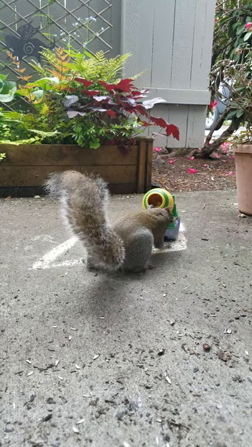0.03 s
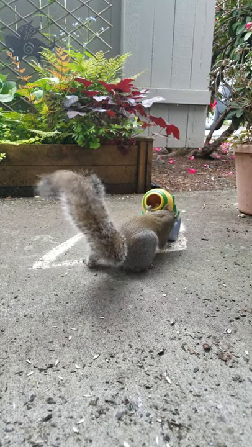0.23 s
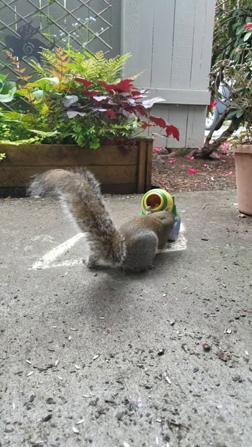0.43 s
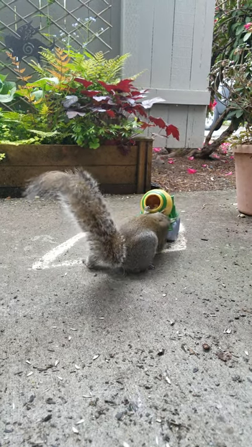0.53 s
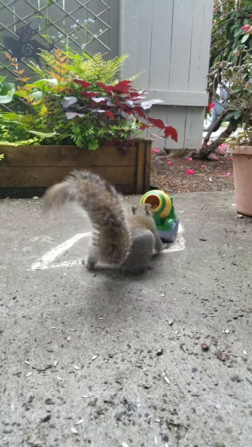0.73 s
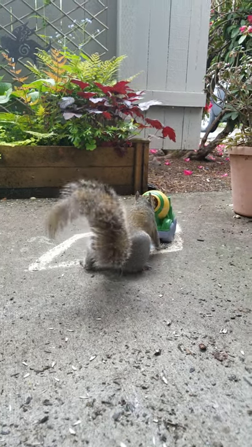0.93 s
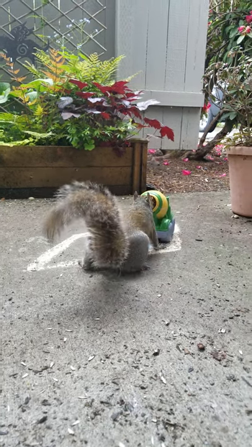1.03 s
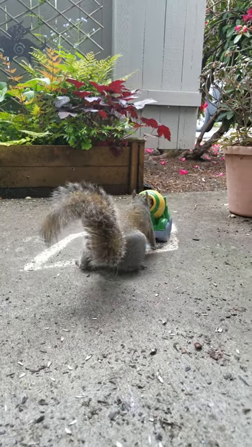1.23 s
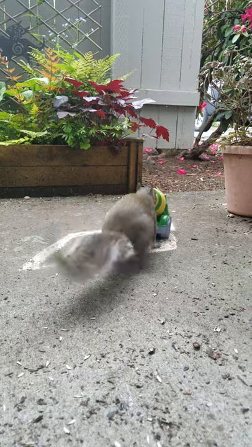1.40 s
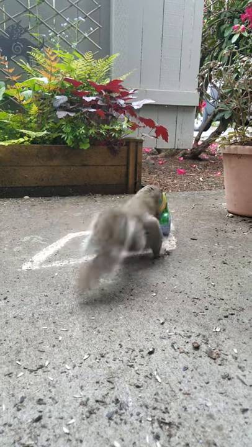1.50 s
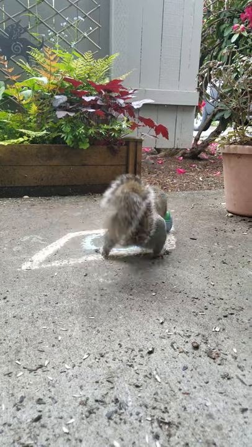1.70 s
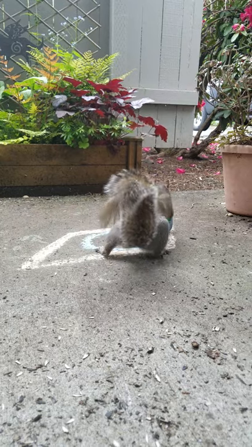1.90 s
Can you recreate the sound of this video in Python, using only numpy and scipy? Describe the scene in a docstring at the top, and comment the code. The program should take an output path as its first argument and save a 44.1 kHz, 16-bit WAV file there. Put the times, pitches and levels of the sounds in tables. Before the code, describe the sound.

A hollow plastic toy clatters sharply on a concrete patio right at the start, settling by 0.3 seconds. A faint tick follows at 0.4 and a light scuff at 0.7. From about 1.3 to 1.9 seconds the toy is shoved along in jerks, knocking and scraping over crackling sand. It sounds a few metres away, with a short echo, above a low outdoor rumble and faint distant drone.

```python
"""A hollow plastic toy clatters on a concrete patio, knocked by a squirrel a few metres from the mic.
Small ticks and a brief scuff fall in the pause; then the squirrel shoves the toy along in jerks, over
sand, until it rocks to rest. Blows and stick-slip catches ring the same shell, and fence and house wall
answer. A low outdoor rumble and a distant drone lie underneath. Stereo, from two microphone ports."""
import sys
import numpy as np
from scipy import signal
from scipy.fft import rfft, irfft, next_fast_len
from scipy.io import wavfile

SR = 44100
rng = np.random.default_rng(int(sys.argv[2]) if len(sys.argv) > 2 else 0)


def to_wav(sig):
    """Store sig (one row per channel, or 1-D mono) as 16-bit WAV at the path in sys.argv[1].

    Samples outside -1..1 are clipped; the rate is SR.
    """
    pcm = np.clip(np.atleast_2d(sig), -1, 1) * 32767
    pcm = np.round(pcm).astype(np.int16)
    wavfile.write(sys.argv[1], SR, pcm.T)  # frames by channels


N = 85995
T = np.arange(N) / SR
SIZE = next_fast_len(2 * N)
HZ = np.maximum(np.arange(SIZE // 2 + 1) * SR / SIZE, 1)

# Table levels are relative; pan is left minus right.
# outdoor rumble: f/Hz, level/dB
RUMBLE_COLOUR = [(25, -37), (48, -15), (70, -17.5), (100, -3.5), (125, -6), (180, -9), (265, -7),
                 (310, -16), (660, -17), (1080, -14), (1400, -29.5), (1900, -37), (2600, -38), (4500, -47),
                 (7300, -56), (10000, -54), (16000, -48.5)]
# the rumble's side signal against its mid: f/Hz, level/dB
RUMBLE_SIDE = [(30, -4), (120, -43), (300, -32.5), (800, -7.5), (2000, 0.5), (16000, 0)]
# distant drone: t/s, level/dB
DRONE_SWELL = [(0, -64), (.22, -53.5), (.35, -47), (.5, -72), (.63, -48.5), (.83, -44), (1.0, -67.5),
               (1.5, -49), (1.94, -49)]
# echo off fence and house wall: f/Hz, level/dB
ECHO_COLOUR = [(200, 1), (800, 8), (2500, 6.5), (4700, 6), (9000, 4.5), (16000, -3.5)]
# dry ticks and cracking sand grains: t/s, level/dB, centre f/Hz, width/octaves, t60/s
TICKS = [(0.4253, -34, 11000, 0.91, 0.058), (1.463, -30.5, 13000, .5, 0.084),
         (1.5967, -34, 13500, .35, .045), (1.7144, -38, 12100, 0.28, 0.05),
         (1.7962, -33, 11500, 0.57, 0.066), (1.837, -34, 13200, 0.32, 0.035)]
# scuff on the concrete: f/Hz, level/dB
SCUFF_COLOUR = [(800, -23), (2000, 2), (3000, 5.5), (4200, -9), (6200, -7.5), (8500, -18.5), (13000, -15),
                (16000, -26)]
# sand grinding under the toy: t/s, level/dB
GRIT_SWELL = [(1.34, -80), (1.44, -77), (1.47, -58.5), (1.55, -66.5), (1.61, -59.5), (1.71, -65),
              (1.75, -74), (1.78, -66), (1.805, -67), (1.86, -67), (1.89, -82)]
# spectrum of that sand: f/Hz, level/dB
GRIT_COLOUR = [(2000, -35), (5000, 13.5), (6300, 1), (8300, 1.5), (9400, 13), (10000, -1), (16000, -1.5)]
# main modes of the shell: f/Hz, level standing free/dB, level pressed down/dB, t60/s, pan/dB
SHELL_MODES = [(483, -23, -5, 0.049, -4.5), (579, -11, -2.5, 0.055, -2.5), (678, -7, -21, 0.084, 10.5),
               (669, -1, -8, 0.029, 11), (842, 5.5, 5, 0.093, -8), (927, -3.5, -12, 0.051, 3),
               (1123, -5, -11.5, 0.081, -16), (1225, -19, -0.5, 0.036, -7), (1567, -9, -8.5, 0.078, 9.5),
               (1865, -3, -7.5, 0.045, 8.5), (2165, -15.5, -21, 0.09, 6), (2663, -14, -10.5, 0.042, -10),
               (4060, -14.5, -17, 0.068, 6.5), (4404, -11.5, -23, 0.033, -14)]
# dense shell modes between and above them: f/Hz, level/dB
DENSE_COLOUR = [(300, 4), (500, -15.5), (640, -4.5), (1250, 4), (1550, -4.5), (1900, -1.5), (2850, -2),
                (3150, -7.5), (3650, -16.5), (4400, -12.5), (5700, -23.5), (7500, -30.5), (8600, -23.5),
                (12000, -26), (16000, -44)]
# balance of the dense modes at the ports: f/Hz, pan/dB
DENSE_PAN = [(500, -10.5), (1150, -7), (1600, -7.5), (2100, 1), (3000, -7), (4500, -9.5), (7000, 5),
             (10500, -2.5), (13000, 15)]
# friction while the toy slides: t/s, level/dB
DRAG_SWELL = [(1.335, -68), (1.345, -41), (1.385, -47), (1.43, -42), (1.452, -40.5), (1.465, -34),
              (1.52, -36), (1.545, -54.5), (1.575, -40.5), (1.61, -35.5), (1.632, -37), (1.665, -40.5),
              (1.69, -44.5), (1.715, -56.5), (1.75, -52.5), (1.81, -49), (1.88, -55.5)]
# blows on the toy: t/s, level/dB, treble/dB, sizzle/dB, pitch ratio of the loaded shell
KNOCKS = [(.0512, -9.5, -1.5, 14.5, 1.06), (.0536, 3, 1.5, 3, .98), (.0552, -1.5, -2, 1, 1.046),
          (.0605, -7.5, 4, 8, 1.01), (.075, -2, -1, 6, 0.95), (.092, -9, -3, 5, 1.06),
          (.1318, -6.5, -13, -29, 0.98), (.1965, -12.5, 0, -6, 1.04), (1.3375, -17, 3.5, -9, 0.91),
          (1.347, -11, -0.5, -14, 0.9), (1.3625, -5, -5.5, -2.5, 1), (1.383, -13.5, -7, -5, .98),
          (1.420, -10, -16, -19, 0.92), (1.457, -16.5, 7, -8, 1.18), (1.484, -6, -6, -5, .99),
          (1.502, -29, 10, -3, .98), (1.524, -8, -2.5, -16, 1.01), (1.561, -11, -2, -2, 0.98),
          (1.580, -12.5, -10, -9, 0.9), (1.599, -16, 3, -21, 1.09), (1.635, -29, -29, -28, 0.71),
          (1.657, -6.5, -5, -3, 1.13), (1.671, -13, 5, -5, 0.98), (1.733, -12.5, -7.5, 4, 0.95),
          (1.741, -9, -9.5, -3, 1.06), (1.772, -13, -4.5, -9, 1.03), (1.784, -16, 6, -23, 1.2),
          (1.838, -13, -4, 4.5, 1.02)]
# single panels or parts struck: t/s, level/dB, f/Hz, t60/s
PANEL_PINGS = [(.0532, -5, 720, 0.027), (.056, -10.5, 2554, 0.073), (0.059, -10.5, 4286, 0.038),
               (.056, -25, 4660, 0.084), (0.1967, -16, 625, .045), (0.1966, -25, 1890, 0.019),
               (1.458, -17.5, 3974, 0.043), (1.457, -8, 1080, 0.026), (1.501, -11.5, 568, 0.13),
               (1.508, -16, 1840, .06), (1.597, -16, 1840, 0.081), (1.659, -6.5, 1180, .06)]
# the toy's direction from the mic: f/Hz, lead of the left port/rad
PORT_PHASE = [(0, 0), (800, .6), (1200, 2.6), (2000, 5.6), (3000, 7.6), (4000, 11.7), (5000, 15),
              (16000, 45)]

TREBLE_HZ, SIZZLE_HZ, RADIATION_HZ = 1600, 5700, 442
RING_S, CONTACT_S, SPOT_S = .16, .00018, .025  # length of a ring, its rise, time rubbed on one spot
DETUNE, MODE_SPREAD_DB = .0041, 1  # scatter per contact; DETUNE is the fraction at TREBLE_HZ
DENSE_DB, DENSE_T60_S = -5, .072
PRESSED_FROM_S, PRESSED_RING, PRESSED_CONTACT = 1.3, .74, .86  # paws press down: factors on t60 and rise


def undb(db):
    """Decibels to gain."""
    return 10 ** (np.asarray(db) / 20)


def curve(points):
    """Gain at each frequency from (f/Hz, level/dB) points."""
    hz, db = np.array(points).T
    return undb(np.interp(np.log(HZ), np.log(hz), db))


def swell(points):
    """Gain in time from (t/s, level/dB) points, silent outside them."""
    s, db = np.array(points).T
    return undb(np.interp(T, s, db)) * (T > s[0]) * (T < s[-1])


def bump(hz, octaves):
    """A bell-shaped band."""
    return np.exp(-.5 * (np.log2(HZ / hz) / octaves) ** 2)


def fade(t60, start):
    """Sudden onset and exponential decay."""
    return (T >= start) * np.exp(-np.log(1000) * np.maximum(T - start, 0) / t60)


def filt(x, gain):
    """Apply a frequency response."""
    return irfft(rfft(x, SIZE) * gain, SIZE)[..., :N]


def unit(x):
    """Scale to a mean energy of 1 per channel."""
    return x / np.sqrt(np.mean(np.sum(x ** 2, axis=-1)))


def pan(db):
    """Port gains for a left-minus-right level difference."""
    return undb(np.array([[1], [-1]]) * db / 2)


def add(out, x, s):
    """Mix a sound in at s seconds."""
    i = int(s * SR)
    out[:, i:i + x.shape[1]] += x[:, :N - i]


def noise(gain):
    """Coloured noise, rms 1."""
    x = filt(rng.standard_normal(N), gain)
    return x / x.std()


def stereo_noise(gain, side):
    """Coloured noise with independent mid and side signals, rms 1."""
    mid_noise, side_noise = rng.standard_normal((2, N))
    x = filt(mid_noise, gain) + np.array([[1], [-1]]) * filt(side_noise, gain * side)
    return x / x.std()


def catches(per_s, spread_db=2.5):
    """Irregular small pushes of uneven size, rms 1."""
    hits = rng.random(N) < per_s / SR
    sizes = undb(spread_db * np.clip(rng.standard_normal(N), -2, 2))
    x = hits * sizes * rng.choice([-1, 1], N)
    return x / x.std()


def outdoors(drone_hz=134.8, right_lag_s=.00026):
    """A slightly fluttering rumble and a distant drone, reaching the left port first."""
    rumble = stereo_noise(curve(RUMBLE_COLOUR), curve(RUMBLE_SIDE))
    flutter_db = noise(bump(hz=9, octaves=.18))
    rumble *= undb(-47 + flutter_db)
    drone = undb(np.interp(T, *np.array(DRONE_SWELL).T)) * noise(bump(drone_hz, octaves=.08))
    ports = np.exp(-2j * np.pi * HZ * right_lag_s * np.array([[0], [1]]))
    return pan(-3) * filt(rumble + drone, ports)


def patio_echo(x):
    """Fence and house wall add a short diffuse echo to the direct sound."""
    tail = unit(stereo_noise(curve(ECHO_COLOUR), side=.64) * fade(t60=.32, start=.0099))
    return x + undb(-15) * filt(x, rfft(tail, SIZE))


def tap(s=.7127, hz=1600):
    """One tiny dull tap, close up at the right-hand port."""
    ring = np.sin(2 * np.pi * hz * (T - s)) * fade(t60=.0012, start=s)
    return pan(-26.5) * undb(-30.5) * filt(ring, bump(hz, octaves=1))


def ticks():
    """Dry ticks and cracking grains: short bursts of high noise."""
    out = np.zeros((2, N))
    for s, db, hz, octaves, t60 in TICKS:
        burst = rng.standard_normal((2, N)) * fade(t60, s)
        out += undb(db) * unit(filt(burst, bump(hz, octaves)))
    return out


def sand(colour, per_s):
    """Grains crushed on concrete, independent at each port, rms 1."""
    x = filt(np.array([catches(per_s), catches(per_s)]), curve(colour))
    return x / x.std()


def scuff(s=.699, width_s=.018):
    """One light scuff over the sandy concrete."""
    return undb(-55) * sand(SCUFF_COLOUR, per_s=3500) * np.exp(-.5 * ((T - s) / width_s) ** 2)


def grit(clump_hz=30, clump_db=2):
    """The sliding toy crushes sand in clumps."""
    clumps = undb(clump_db * noise(bump(clump_hz, octaves=1)))
    return pan(.5) * swell(GRIT_SWELL) * clumps * sand(GRIT_COLOUR, per_s=2100)


def hardness(x, treble_db, sizzle_db):
    """A harder contact is brighter: two high shelves shape the top."""
    for hz, db in ((TREBLE_HZ, treble_db), (SIZZLE_HZ, sizzle_db)):
        g = undb(db) ** .5
        w = 2 * SR * np.tan(np.pi * hz / SR)
        shelf = signal.bilinear([g, np.sqrt(2 * g) * w, w * w], [1 / g, np.sqrt(2 / g) * w, w * w], SR)
        x = signal.lfilter(*shelf, x + 1e-18)
    return x


def shell(dense, pressed, pitch):
    """One ring of the shell: each contact weights and detunes the modes anew; pressure damps them."""
    t = T[:int(RING_S * SR)]
    hz, free_db, pressed_db, t60, pan_db = np.array(SHELL_MODES).T
    db, ring, rise = (pressed_db, PRESSED_RING, PRESSED_CONTACT) if pressed else (free_db, 1, 1)
    count = len(hz)
    detune = DETUNE * np.minimum(hz / TREBLE_HZ, 2) * rng.standard_normal(count)
    hz = pitch * hz * (1 + detune)
    weights = undb(db + MODE_SPREAD_DB * rng.standard_normal(count)) * (-1) ** np.arange(count)
    decay = -np.log(1000) * t / ring
    partials = np.sin(2 * np.pi * hz[:, None] * t) * np.exp(decay / t60[:, None])
    main_ring = (pan(pan_db) * weights) @ partials
    i = rng.integers(N - len(t))
    dense_ring = dense[:, i:i + len(t)] * np.exp(decay / DENSE_T60_S)
    attack = 1 - np.exp(-t / (CONTACT_S * rise))
    return unit(main_ring * attack) + undb(DENSE_DB) * unit(dense_ring * attack)


def rub(dense, push, start, end, pitch):
    """Small pushes ring the shell, whose colour shifts as the contact moves from spot to spot."""
    out = np.zeros((2, N))
    step = int(SPOT_S * SR)
    for i in range(int(start * SR), int(end * SR), step):
        ring = shell(dense, start >= PRESSED_FROM_S, pitch)
        add(out, signal.fftconvolve(push[None, i:i + step], ring), i / SR)
    return out


def rattle(dense, start=.055):
    """Loose parts chatter against the shell after the first blow."""
    force = undb(-26) * fade(t60=.18, start=start) * catches(per_s=900)
    push = hardness(force, treble_db=3.5, sizzle_db=2)
    return rub(dense, push, start, end=.25, pitch=.98)


def drag(dense):
    """Pressed down and shoved, the toy sticks and slips on the concrete."""
    force = swell(DRAG_SWELL) * catches(per_s=1100)
    push = hardness(force, treble_db=.5, sizzle_db=-8)
    return rub(dense, push, PRESSED_FROM_S, end=T[-1], pitch=1)


def knocks(dense):
    """Blows ring the whole shell; some land on a panel that rings with its own note."""
    out = np.zeros((2, N))
    for s, db, treble_db, sizzle_db, pitch in KNOCKS:
        ring = shell(dense, s > PRESSED_FROM_S, pitch)
        add(out, undb(db) * hardness(ring, treble_db, sizzle_db), s)
    for s, db, hz, t60 in PANEL_PINGS:
        ping = np.sin(2 * np.pi * hz * (T - s)) * fade(t60, s)
        out += pan(-.5) * undb(db) * unit(ping)
    return out


def toy():
    """The hollow toy, a few metres from the mic and too small to radiate bass."""
    dense = stereo_noise(curve(DENSE_COLOUR), side=undb(-3))  # crowded modes blur into noise
    dense = filt(dense, curve(DENSE_PAN) ** np.array([[.5], [-.5]]))
    vibration = rattle(dense) + drag(dense) + knocks(dense)
    radiated = signal.sosfilt(signal.butter(8, RADIATION_HZ, "high", fs=SR, output="sos"), vibration)
    right_lag_rad = np.interp(HZ, *np.array(PORT_PHASE).T)
    ports = np.exp(-1j * np.array([[0], [1]]) * right_lag_rad)
    return undb(4.5) * filt(radiated, ports)


def scene():
    """Toy and small sounds out on the patio, a dry tap at the mic, the outdoors behind."""
    return patio_echo(toy() + ticks() + scuff() + grit()) + tap() + outdoors()


def record(dry, top_hz=16200):
    """The recorder cuts the top steeply."""
    return signal.sosfilt(signal.ellip(10, .2, 80, top_hz, fs=SR, output="sos"), dry)


dry = scene()
out = record(dry)
to_wav(out)
```